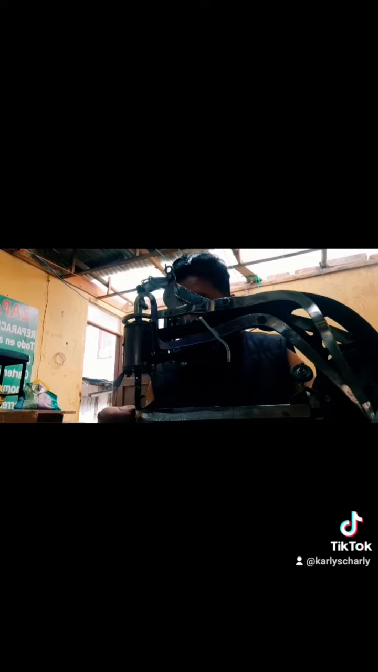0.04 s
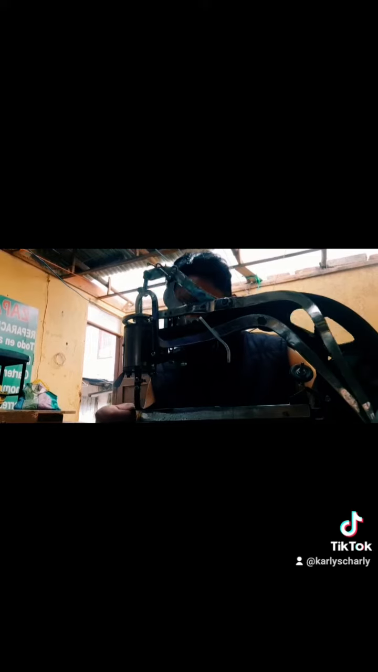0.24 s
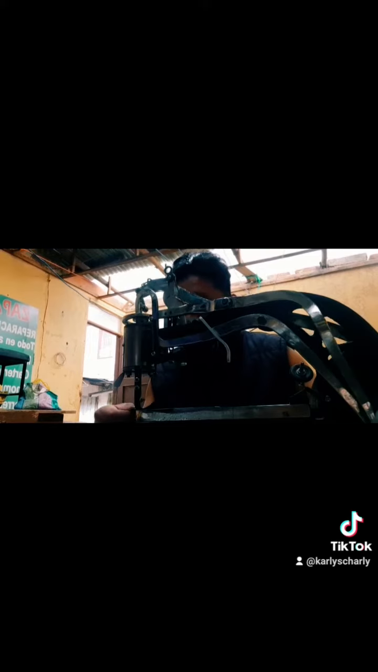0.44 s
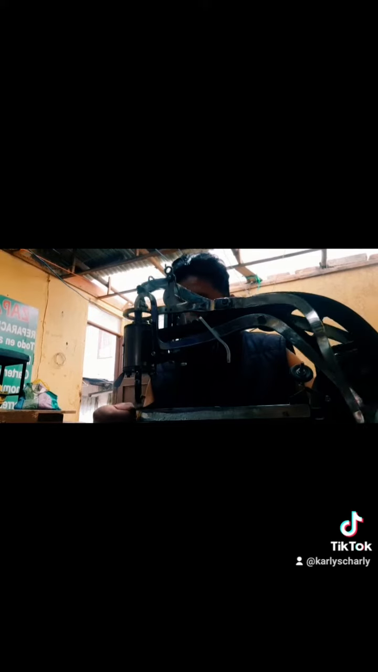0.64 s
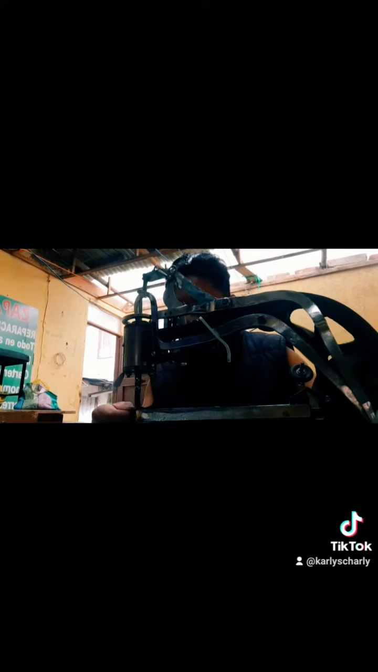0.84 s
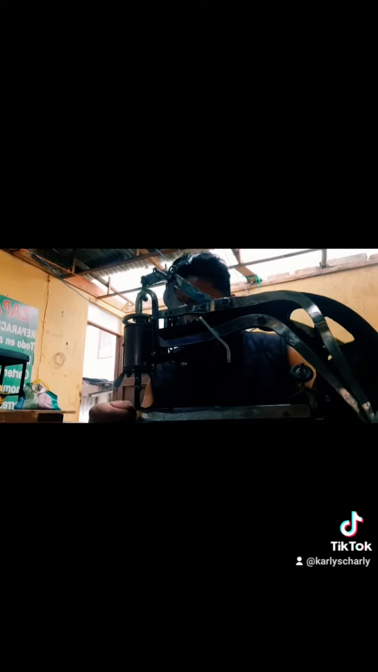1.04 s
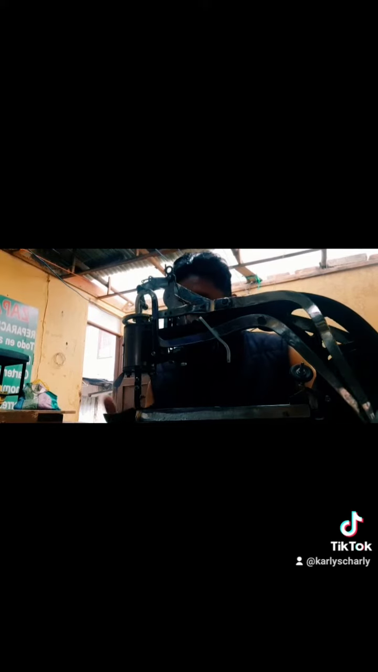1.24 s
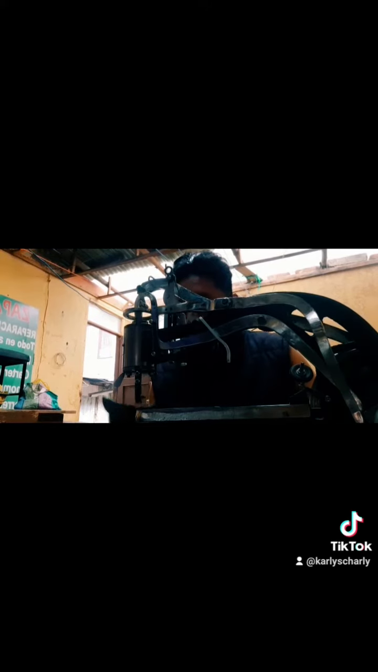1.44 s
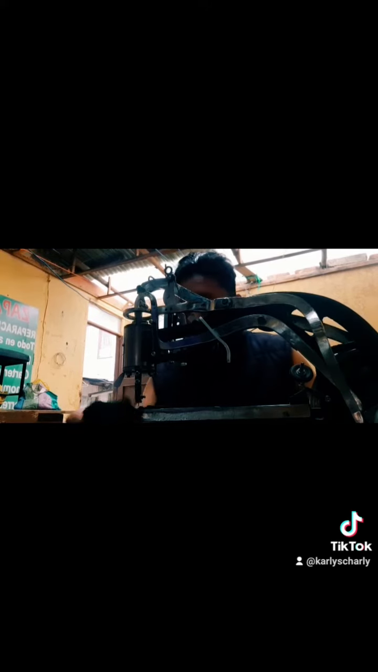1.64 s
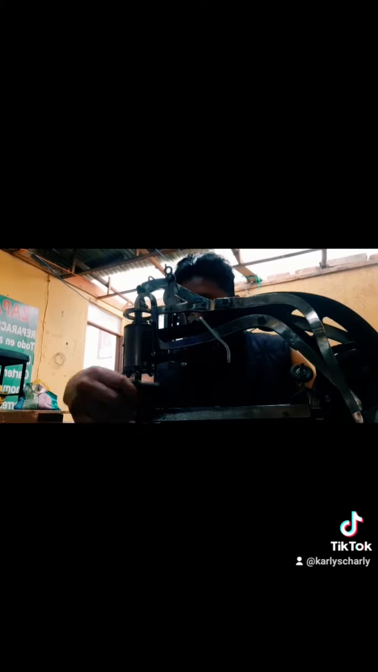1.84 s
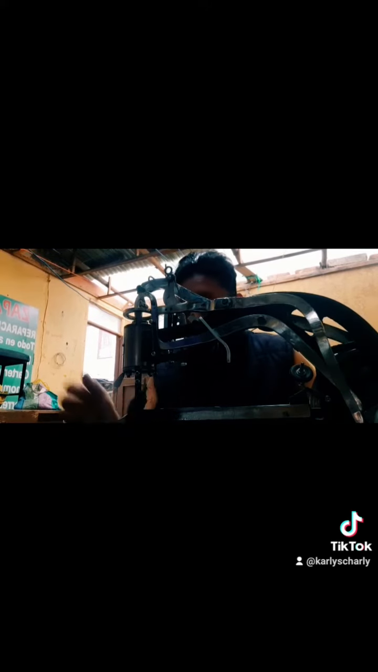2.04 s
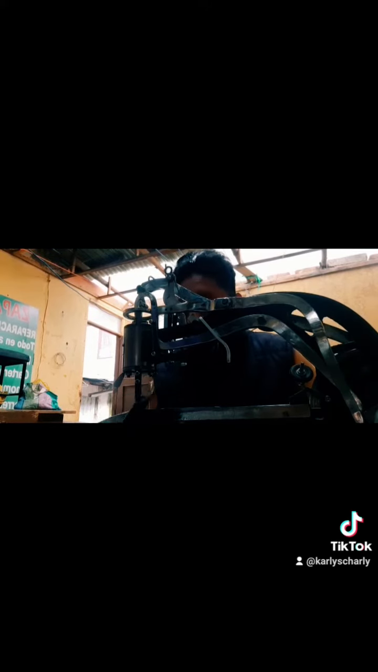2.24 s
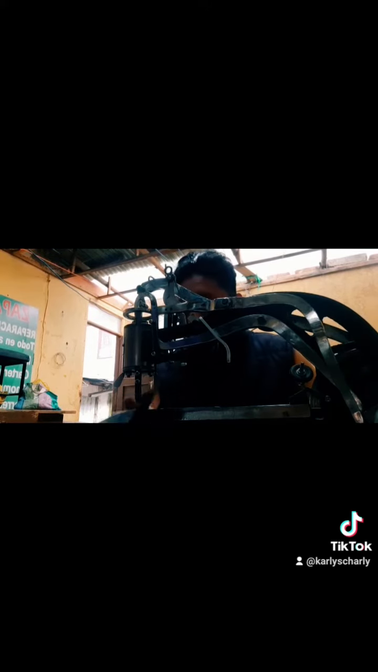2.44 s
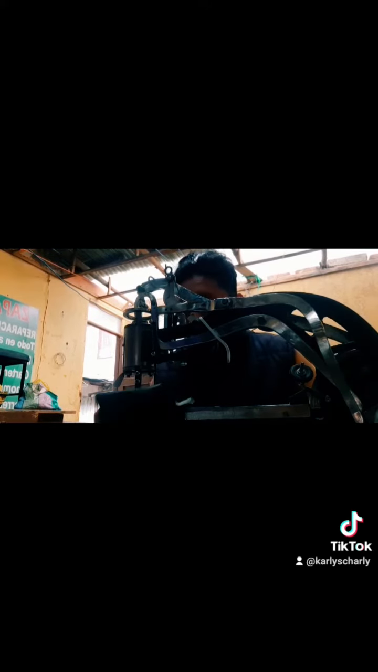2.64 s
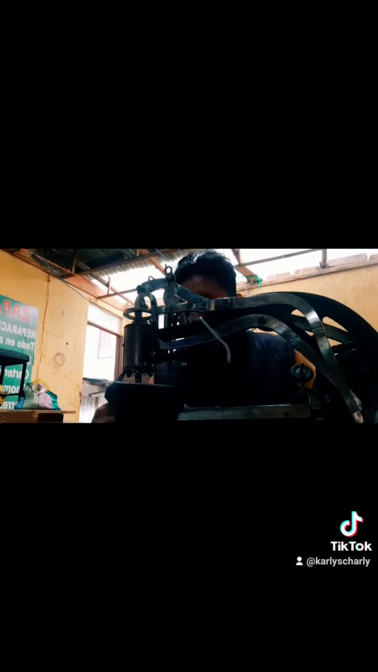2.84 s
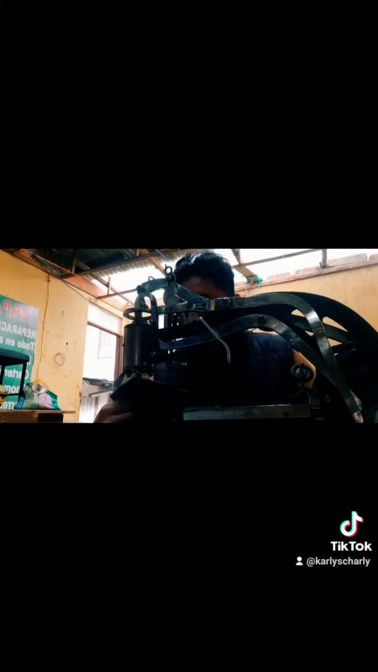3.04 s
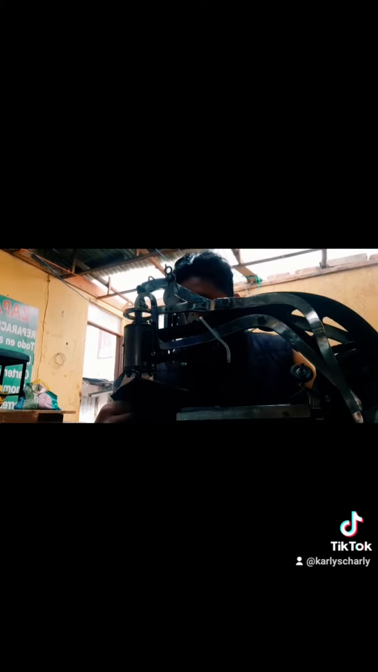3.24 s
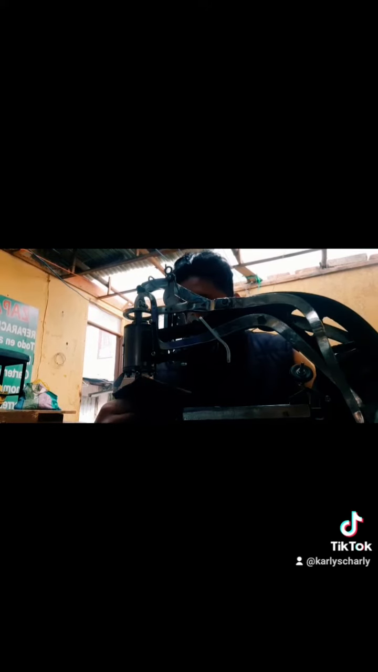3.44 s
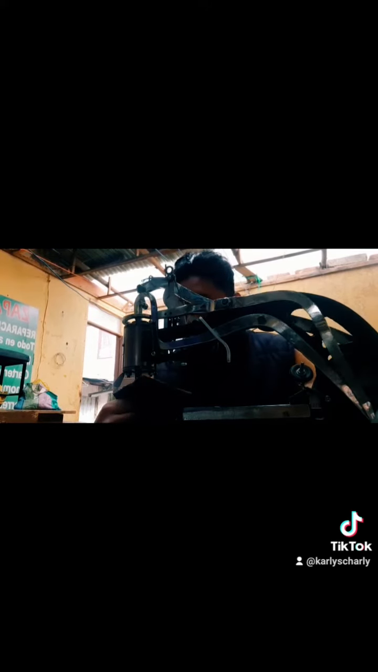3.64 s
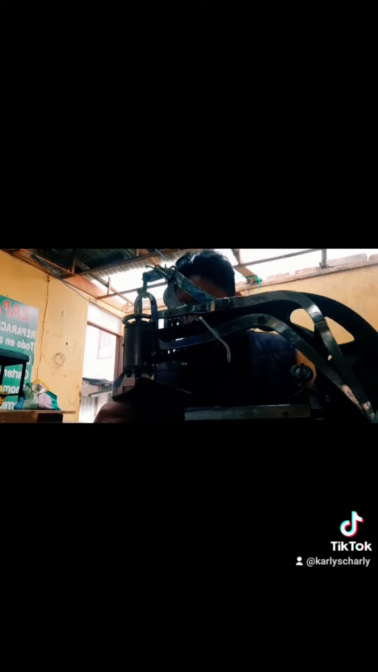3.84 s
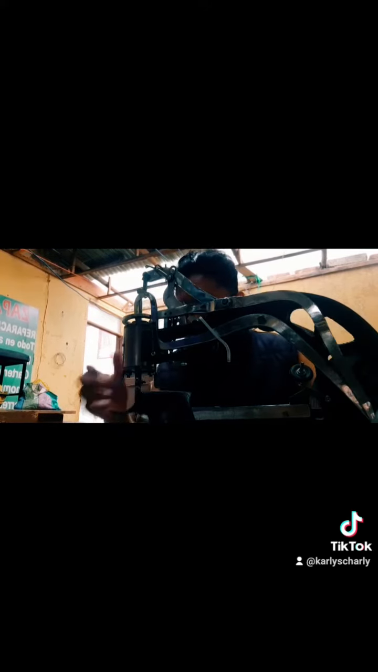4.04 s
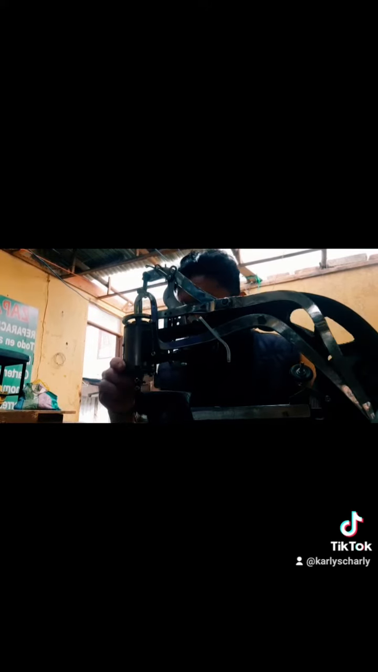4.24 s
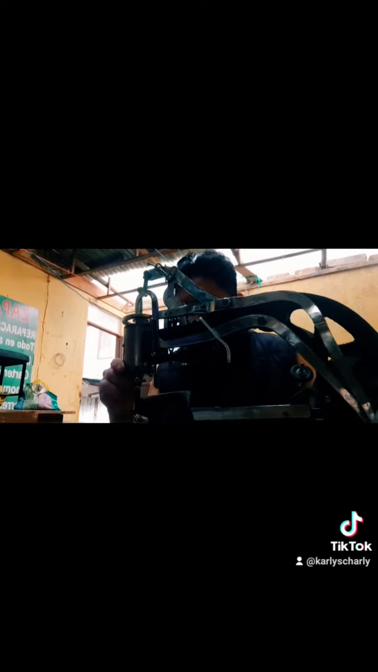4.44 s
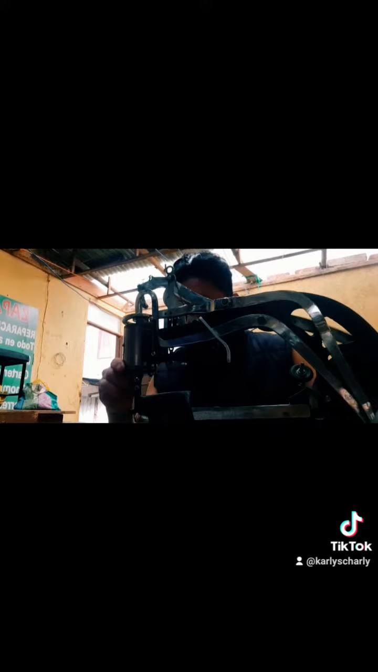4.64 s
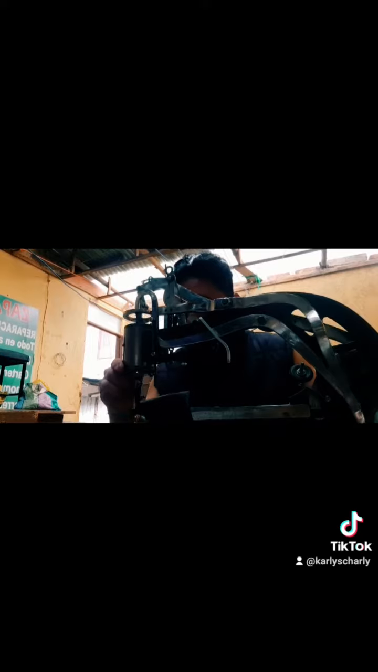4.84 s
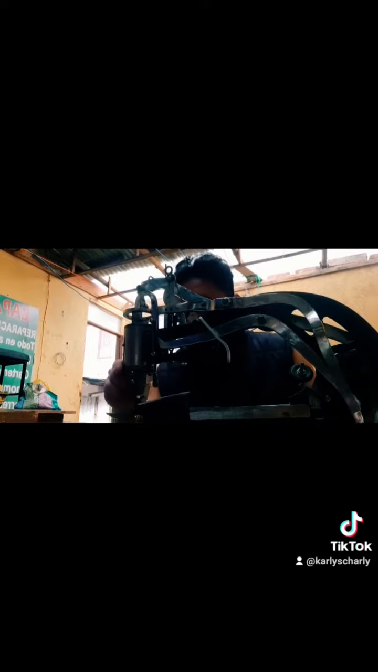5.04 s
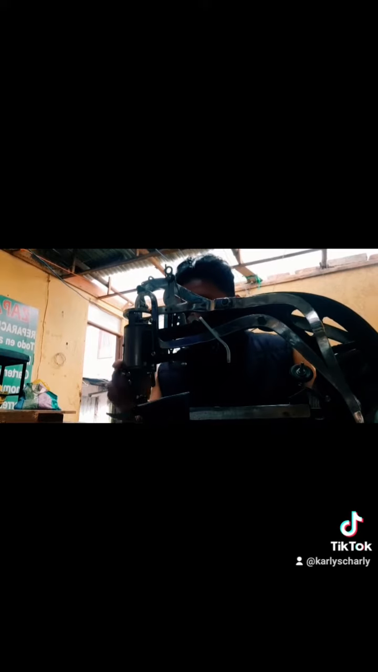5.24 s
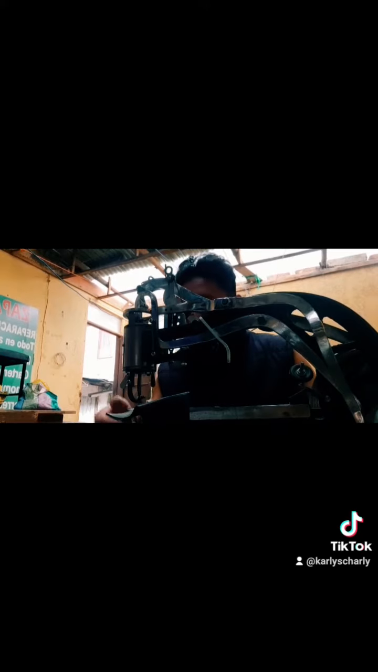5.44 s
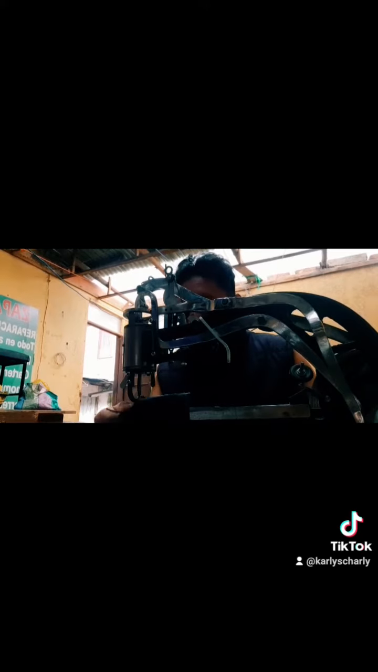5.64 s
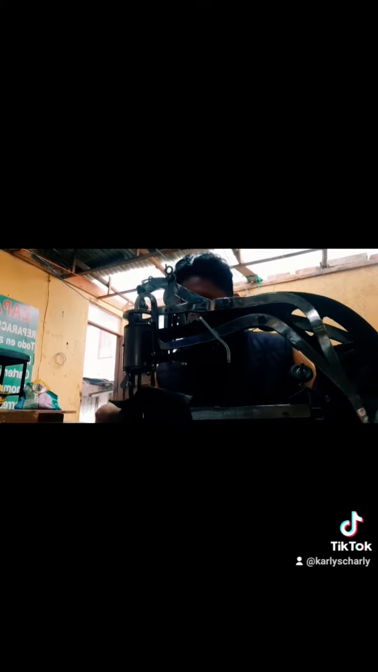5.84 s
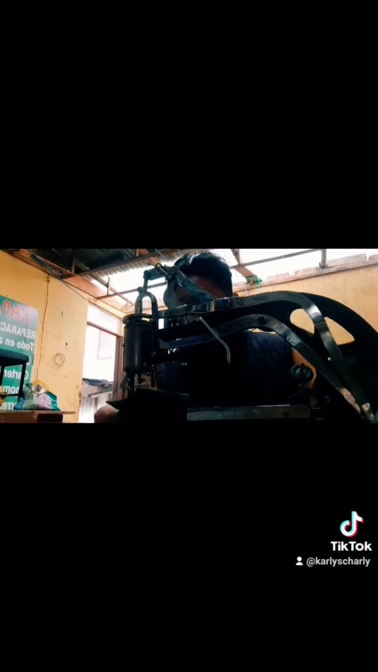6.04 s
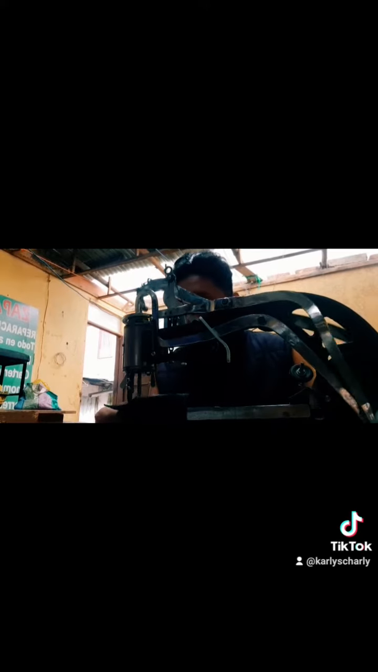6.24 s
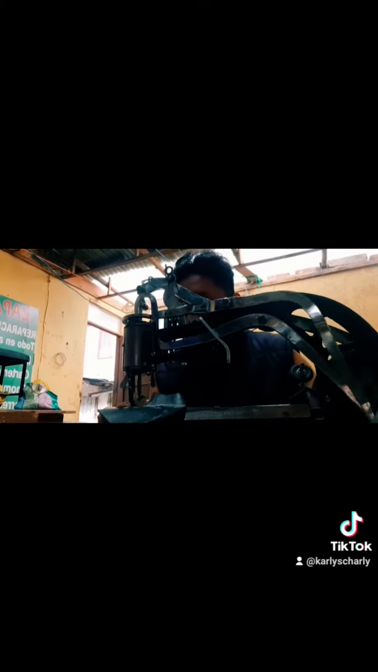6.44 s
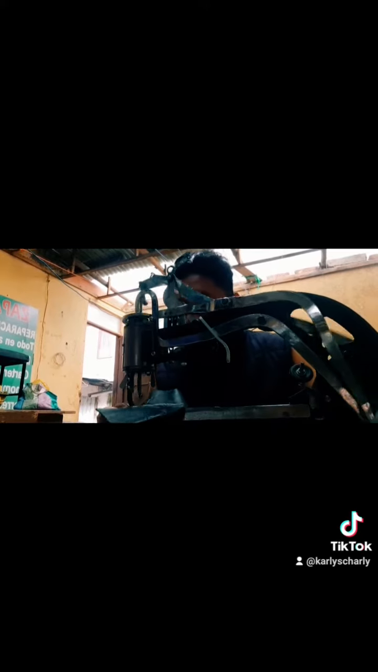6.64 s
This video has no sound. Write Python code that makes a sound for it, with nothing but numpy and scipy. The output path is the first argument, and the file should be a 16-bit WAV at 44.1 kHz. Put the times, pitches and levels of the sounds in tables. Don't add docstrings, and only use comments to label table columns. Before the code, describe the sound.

From 0 to about 1.4 seconds a heavy hand-cranked iron stitching machine clatters very close by, in several overlapping pulls: mid-pitched gear chatter, hard irregular knocks, snapping levers and small bright steel pings, the loudest blows crackling. The iron hum and short hard-walled echo fade. From 1.5 to 3.3 it is quiet: dull street wash, a barely audible low engine, thin dry squeaks, brushing strokes near 1.8 and 2.45 with a fainter one at 3.0, and a tiny tap at 2.4. A short pull clacks from about 3.4 to 3.8. Quiet again, with small squeaks near 4.1, then uneven knocking stitches from 4.3 to 4.85, strongest around 4.7. Another lull holds only faint wash, a soft touch and a weak squeak. At 5.7 cranking restarts, grows heavy by 5.9, and pounds in dense bursts until the abrupt end near 6.7.

```python
import sys
import numpy as np
from scipy import signal
from scipy.fft import rfft, irfft
from scipy.io import wavfile
from scipy.ndimage import uniform_filter1d, minimum_filter1d

SR = 44100
rng = np.random.default_rng(int(sys.argv[2]) if len(sys.argv) > 2 else 0)


def ratio_of_db(decibels):
    return 10 ** (np.asarray(decibels, float) / 20)


def dump(signal):
    limited = np.clip(np.atleast_2d(signal).T, -1, 1)
    pcm = np.round(limited * 32767).astype(np.int16)
    wavfile.write(sys.argv[1], SR, pcm)


N = 295470
PORT_LAG = 8

# pitch in Hz, width in Hz, level in dB.
BASE_MODES = [(351, 34, -2.5), (491.3, 76, -3.5), (573, 52.6, 3), (644.5, 70, -1)]
# pitch in Hz, width in Hz, level in dB.
HEAD_MODES = [(1530, 290, -3), (1608, 150, 4), (1724, 81, -2.5), (1756, 40, -11.5)]
# pitch in Hz, width in Hz, level in dB.
PART_MODES = [(2230, 230, 21), (2440, 330, 4.5), (3080, 140, -5), (3060, 1200, -15.5), (3672, 140, 15.5),
              (3890, 95, 4.5), (4760, 490, -1), (4780, 1200, -21), (6490, 620, -25.5)]


def evened(x):
    return x / np.sqrt(np.mean(x ** 2) + 1e-20)


def read(points, hz):
    f, value = np.transpose(points)
    return np.interp(np.log(hz + 1), np.log(f + 1), value)


def add(mix, s, sound):
    part = mix[..., round(s * SR):][..., :sound.shape[-1]]
    part += sound[..., :part.shape[-1]]


def resonate(x, hz, width):
    turn = np.exp(2j * np.pi * np.cumsum(hz * np.ones(len(x))) / SR)
    r = np.exp(-np.pi * width / SR)
    return 2 * (turn * signal.lfilter([1 - r], [1, -r], x / turn + 1e-18)).real


def coloured(x, points):
    hz = np.fft.rfftfreq(x.shape[-1], 1 / SR)
    return irfft(rfft(x) * ratio_of_db(read(points, hz)), x.shape[-1])


def ports(x, lag, pan_db):
    left = np.r_[np.zeros(lag), x[:len(x) - lag]]
    return np.array([left, x]) * ratio_of_db(np.array([[.5], [-.5]]) * pan_db)


def blow_ports(x):
    lag_samples, pan_db = PORT_LAG + round(2 * rng.standard_normal()), 1 + 2 * rng.standard_normal()
    return ports(x, max(lag_samples, 0), pan_db)


def drone():
    # middle in seconds, level in dB, half length in seconds.
    swells = [
        (1.607, -81, 0.3),
        (3.148, -77, 0.12),
        (4.196, -79, 0.094),
    ]
    t, hz = np.arange(N) / SR, 92
    note = evened(resonate(resonate(rng.standard_normal(N), hz, 14), hz, 18))
    swell = sum(ratio_of_db(db) * np.exp(-((t - s) / half) ** 2) for s, db, half in swells)
    return note * (ratio_of_db(-93.0) + swell)


def street():
    # pitch in Hz, level in dB per Hz.
    street_spectrum = [(24, -68.5), (40, -36.5), (167, -72), (278, -28.5), (417, -16.5), (640, 0),
                       (724, -10.5), (785, -6.5), (1070, -9), (2300, -21), (2700, -33), (4000, -35),
                       (5230, -59), (6800, -85), (11500, -120)]
    # time in seconds, level in dB.
    street_level = [
        (1.6, -49.5),
        (2.299, -48.5),
        (2.599, -49.5),
        (3.3, -47.5),
        (4., -52.5),
        (4.3, -40.5),
        (5.199, -48),
        (5.501, -54),
        (5.7, -47),
    ]
    a, b, c, d, patches = rng.standard_normal((N // 128 + 5, 257, 5)).T
    patches = evened(uniform_filter1d(uniform_filter1d(patches, 3, 0), 30, 1))
    left = a + 1j * b
    right = .7 * left + .7 * (c + 1j * d)
    z = np.array([left, right]) * ratio_of_db(2.5 * patches)
    wash = coloured(signal.istft(z, nperseg=512, noverlap=384)[1][:, :N], street_spectrum)
    level_db = np.interp(np.arange(N) / SR, *np.transpose(street_level)) - 3.0
    return ratio_of_db(level_db) * evened(wash)


def brushing():
    # pitch in Hz, level in dB per Hz.
    brush_spectrum = [(300, -28), (700, -2), (1500, 2.5), (2200, -0.5), (3200, -15.5), (4500, -15),
                      (6000, -21), (7800, -28), (9000, -47)]
    # peak in seconds, level in dB, rise in seconds, fall in seconds.
    strokes = [
        (1.814, -47, 0.023, 0.07),
        (2.45, -47.5, 0.074, 0.036),
        (3.02, -58, 0.12, 0.05),
    ]
    t = np.arange(N) / SR
    bristles = evened(coloured(rng.standard_normal(N), brush_spectrum))
    return bristles * sum(ratio_of_db(db) * np.exp(-((t - s) / np.where(t < s, rise, fall)) ** 2)
                          for s, db, rise, fall in strokes)


def wavering_tone(length, hz0, hz1, db, width):
    size = round(length * SR)
    glide = np.linspace(hz0, hz1, size)
    tone = resonate(resonate(rng.standard_normal(size), glide, width), glide, 3 * width)
    return ratio_of_db(db) * evened(tone) * np.hanning(size) ** .6


def squeaks_and_plate():
    # start in seconds, length in seconds, pitch at start in Hz, pitch at end in Hz, level in dB.
    squeaks = [(1.479, 0.37, 2070, 2150, -55), (1.596, 0.28, 2260, 2300, -61),
               (2.928, 0.15, 1990, 2070, -59.5), (1.875, 0.22, 1013, 984, -56.5),
               (1.998, 0.078, 770, 716, -56), (2.798, 0.043, 810, 774, -52.5),
               (4.09, 0.14, 1203, 1184, -53), (3.984, 0.14, 1030, 1066, -57),
               (4.214, 0.064, 1480, 1585, -45), (5.391, 0.39, 1640, 1530, -62.5),
               (5.591, 0.059, 1760, 1880, -60.5)]
    # start in seconds, length in seconds, level in dB.
    after_rings = [
        (1.282, 0.5, -51.5),
        (2.318, 1, -80.5),
        (4.887, 0.67, -65),
    ]
    plate_hz, plate_width_hz = 327, 33
    out = np.zeros(N)
    for s, length, hz0, hz1, db in squeaks:
        add(out, s, wavering_tone(length, hz0, hz1, db, width=0.035 * hz1))
    for s, length, db in after_rings:
        add(out, s, wavering_tone(length, plate_hz, plate_hz, db, plate_width_hz))
    return out


def lone_rings(x):
    hz, _, z = signal.stft(x, SR, nperseg=1024, noverlap=768)
    strong = abs(z) > 1.7 * uniform_filter1d(abs(z), size=25, axis=0)
    keep = strong | (hz[:, None] < 5600)
    return signal.istft(z * keep, SR, nperseg=1024, noverlap=768)[1][:len(x)]


def walls(x):
    # pitch in Hz, decay by 60 dB in seconds.
    wall_decay = [(300, 0.68), (800, 0.5), (2000, 0.39), (4000, 0.31), (7000, 0.47), (10000, 0.12)]
    taps = np.zeros((6, 30000))
    at = np.arange(300, 29980, 20) + rng.integers(0, 20, (6, 1484))
    np.put_along_axis(taps, at, rng.choice([-1., 1.], at.shape), 1)
    hz, t, z = signal.stft(taps, SR, nperseg=256)
    tail = signal.istft(z * ratio_of_db(-60 * t / read(wall_decay, hz)[:, None]), SR, nperseg=256)[1]
    turn = np.sqrt(2 / 3) * np.cos(np.pi * (7.3 * np.arange(N) / SR + np.arange(3)[:, None] / 3))
    wet = signal.oaconvolve(np.repeat(x * turn, 2, axis=0), tail / np.linalg.norm(tail[0]), axes=1)
    return wet[:, :N].reshape(3, 2, N).sum(0)


def small_hits():
    # start in seconds, peak in dB, ring in Hz.
    teeth = [(0.317, -12, 924), (0.346, -12.5, 1040), (0.358, -13.5, 927), (0.39, -7.5, 979),
             (0.451, -7, 926), (0.507, -7, 1082), (0.755, -9, 933), (0.806, -10.5, 1056),
             (0.994, -18.5, 928), (1.106, -11, 952), (1.119, -10, 1090), (1.196, -9.5, 879),
             (3.559, -13.5, 943), (3.636, -10.5, 848), (3.666, -9.5, 820), (4.272, -24.5, 854),
             (4.622, -17, 965), (4.696, -3.5, 934), (4.843, -14, 920), (5.837, -18, 1074),
             (5.863, -13.5, 660), (5.912, -9, 952), (5.949, -1.5, 819), (6.142, -8.5, 1038),
             (6.165, -7, 1020), (6.231, -6, 1150), (6.289, -8, 1106), (6.607, -7, 949), (6.634, -4.5, 951)]
    # start in seconds, peak in dB, ring in Hz.
    taps = [(0.1154, -26.5, 2433), (0.2099, -18.5, 2910), (0.5008, -10, 2350), (0.7524, -15.5, 2150),
            (0.8659, -19.5, 2230), (0.9941, -18, 2306), (1.1847, -16, 2226), (1.2191, -11, 2180),
            (1.2544, -17, 2280), (3.676, -15, 2230), (4.3624, -25, 2420), (4.6683, -12.5, 2004),
            (4.7456, -3.5, 2235), (4.7676, 0.5, 2135), (5.7189, -27.5, 2260), (6.1055, -17, 2000),
            (6.2562, -5, 2270), (6.2831, -1, 2097), (6.3734, -18, 2230), (6.4617, -13, 2270),
            (6.5564, -6, 2097)]
    # start in seconds, peak in dB, ring in Hz.
    pings = [(0.2914, -19.5, 3720), (0.4713, -24, 3720), (0.486, -22, 3800), (0.5302, -22, 3976),
             (0.5424, -24, 3770), (0.8337, -23.5, 3840), (0.9941, -25.5, 3380), (1.255, -24, 3890),
             (3.5676, -22.5, 3790), (3.6945, -25.5, 3340), (3.796, -37, 3320), (4.4967, -26, 3890),
             (4.571, -24.5, 3670), (4.7526, -19, 3730), (5.7892, -11, 3320), (5.8638, -23, 4030),
             (5.9454, -33, 3460), (6.1174, -21, 3790), (6.2577, -20.5, 3860), (6.2911, -23, 3800),
             (6.3266, -19.5, 3850), (6.4367, -21.5, 3720), (6.5024, -27, 3550)]
    # start in seconds, peak in dB, ring in Hz.
    snaps = [(0.2124, -8.5, 1680), (0.5521, -12.5, 1300), (0.7233, -9, 1528), (0.8764, -8.5, 1650),
             (0.9448, -15, 1493), (5.8625, -21, 1693), (5.9882, -8, 1697), (6.3279, -5.5, 1520),
             (6.3474, -8, 1430), (6.5554, -11, 1655), (2.381, -28.5, 630), (2.378, -26.5, 1335),
             (2.39, -31, 826), (4.206, -34.5, 1600)]
    out, t = np.zeros((2, N)), np.arange(3000) / SR
    for rows, t60, gain_db in ((teeth, .045, -5.5), (taps, .025, -3.5), (pings, .018, 1), (snaps, .03, 0)):
        for (s, db, hz), luck in zip(rows, rng.standard_normal((len(rows), 3))):
            second_hz = hz * (1 + 0.087 * luck[0])
            pair = np.sin(2 * np.pi * hz * t) + 0.39 * np.sin(2 * np.pi * second_hz * t)
            ring = pair * (1 - np.exp(-t * hz / 3.1)) * ratio_of_db(-60 * t / t60)
            ring *= ratio_of_db(db + gain_db) / abs(ring).max()
            add(out, s, ports(ring, max(PORT_LAG + round(luck[1]), 0), 1 + 2 * luck[2]))
    return out


def impacts(size, per_s, spread_db):
    hit = rng.random(size) < per_s / SR
    return hit * rng.choice([-1, 1], size) * ratio_of_db(spread_db * np.minimum(rng.exponential(1, size), 3))


def rung(drive, modes, pitch=1):
    return evened(sum(ratio_of_db(db) * resonate(resonate(drive, f * pitch, w), f * pitch, 7 * w) / np.sqrt(w)
                      for f, w, db in modes))


def chatter(rows):
    # factor on the arm's pitch, width in Hz, level in dB.
    arm_modes = [(0.904, 69.8, 5), (1, 53.7, 8.5), (1.135, 61.4, 7.5), (1.268, 80.7, -18.5)]
    # pitch in Hz, width in Hz, level in dB.
    jingle_modes = [(10400, 700, 4), (11900, 900, 9), (13100, 1200, 1)]
    s, *columns = np.transpose(rows)
    t = np.arange(s[0], s[-1], 1 / SR)
    load_db, arm_hz, slack_db = (np.interp(t, s, c) for c in columns)
    arm_db = -2.5 + load_db
    base_db = -5.5 + slack_db + 0.53 * (load_db - slack_db)
    head_db = -1.5 + slack_db + 0.72 * (load_db - slack_db)
    parts_db = -1.5 + slack_db - 2.5

    shared = impacts(len(t), per_s=350, spread_db=3.0)

    def greased(contact_samples):
        own = shared + 1.14 * impacts(len(t), per_s=900, spread_db=3)
        return signal.lfilter(np.hanning(contact_samples), 1, own)

    rattle = .5 * shared + impacts(len(t), per_s=400, spread_db=5)
    scuff = impacts(len(t), per_s=3000, spread_db=3)
    parts = rung(rattle, PART_MODES[:6]) + ratio_of_db(-27) * lone_rings(rung(scuff, PART_MODES[6:]))
    jingle = lone_rings(rung(scuff, jingle_modes))
    frame = ports(ratio_of_db(arm_db) * rung(greased(20), arm_modes, arm_hz), lag=7, pan_db=0.94)
    frame += ports(ratio_of_db(base_db) * rung(greased(24), BASE_MODES), lag=8, pan_db=-7.0)
    frame += ports(ratio_of_db(head_db) * rung(greased(14), HEAD_MODES), lag=8, pan_db=9.3)
    frame += ports(ratio_of_db(parts_db) * parts, lag=6, pan_db=0.3)
    frame += ports(ratio_of_db(1.31 * parts_db + 13) * jingle, lag=6, pan_db=3)
    return s[0], frame * np.minimum((s[-1] - t) / 0.006, 1)


def cranking():
    # time in seconds, load in dB, arm pitch in Hz, slack in dB.
    first_pulls = [
        [(0.0, -4.5, 930, -12.5), (0.032, -13, 936, -38.5), (0.082, -16, 893, -34), (0.114, -16, 1065, -20),
         (0.186, -27, 991, -40), (0.214, -13.5, 972, -17.5), (0.236, -27, 937, -32), (0.268, -32, 994, -26),
         (0.34, -20.5, 907, -44)],
        [(0.35, -26.5, 1004, -39.5), (0.428, -15, 970, -31), (0.448, -17, 968, -34.5),
         (0.498, -17.5, 979, -18.5), (0.588, -18, 1081, -38.5), (0.598, -20.5, 1040, -17.5),
         (0.624, -25, 1077, -36.5), (0.636, -21, 1068, -19.5), (0.68, -24, 1103, -37.5)],
        [(0.69, -14.5, 970, -29.5), (0.736, -16, 968, -30.5), (0.784, -14.5, 959, -26.5),
         (0.804, -12.5, 1002, -20), (0.876, -29.5, 956, -46.5), (0.896, -18, 978, -22),
         (0.926, -21, 943, -37.5), (1.014, -34, 953, -33), (1.04, -22.5, 974, -54)],
        [(1.05, -27, 1040, -52), (1.14, -23, 977, -35.5), (1.156, -12, 955, -36.5), (1.17, -17, 966, -36),
         (1.256, -19.5, 955, -21), (1.286, -14.5, 1013, -33.5), (1.368, -32.5, 1059, -35),
         (1.39, -33, 1130, -31.5), (1.4, -36, 1132, -30)],
    ]
    # time in seconds, load in dB, arm pitch in Hz, slack in dB.
    short_pull = [
        (3.525, -41, 1194, -26),
        (3.573, -17.5, 954, -28.5),
        (3.595, -14.5, 963, -35),
        (3.707, -18.5, 894, -34),
        (3.73, -30.5, 990, -29.5),
        (3.82, -49.5, 992, -56.5),
    ]
    # time in seconds, load in dB, arm pitch in Hz, slack in dB.
    uneven_pull = [
        (4.2, -60.5, 1064, -75.5),
        (4.286, -33, 960, -47.5),
        (4.294, -21.5, 1080, -32),
        (4.4, -36.5, 1003, -52),
        (4.425, -20, 954, -27.5),
        (4.534, -28, 943, -24),
        (4.627, -15, 967, -45),
        (4.783, -17.5, 946, -19.5),
        (4.86, -29, 1000, -34.5),
    ]
    # time in seconds, load in dB, arm pitch in Hz, slack in dB.
    last_pulls = [
        [(5.6, -52.5, 993, -82), (5.712, -46, 1033, -53.5), (5.734, -25, 1030, -37), (5.75, -28, 1003, -45),
         (5.782, -31, 963, -53.5), (5.792, -28.5, 974, -20.5), (5.816, -32, 1054, -32.5),
         (5.856, -21.5, 1067, -25.5), (5.89, -15, 1098, -26)],
        [(5.895, -13, 950, -35), (5.899, -12, 928, -30.5), (5.983, -10.5, 944, -17.5), (5.995, -9, 952, -17),
         (6.025, -22.5, 990, -39), (6.035, -12, 1009, -17), (6.069, -28.5, 945, -35.5),
         (6.087, -19.5, 886, -17.5), (6.16, -35, 981, -31.5)],
        [(6.165, -24, 990, -35.5), (6.195, -15.5, 972, -39), (6.223, -13.5, 942, -34.5),
         (6.235, -18, 1000, -39.5), (6.281, -13, 1037, -18.5), (6.309, -8.5, 1046, -27),
         (6.351, -17.5, 1113, -18.5), (6.391, -30.5, 1055, -22.5), (6.42, -12.5, 1061, -22.5)],
        [(6.425, -13, 956, -31), (6.479, -21.5, 998, -38), (6.487, -10.5, 1091, -17), (6.551, -21, 970, -30.5),
         (6.559, -19.5, 990, -21), (6.613, -24.5, 980, -32), (6.655, -12.5, 956, -48),
         (6.679, -11.5, 960, -26.5), (6.7, -16, 986, -29.5)],
    ]
    frame = np.zeros((2, N))
    for rows in (sum(first_pulls, []), short_pull, uneven_pull, sum(last_pulls, [])):
        add(frame, *chatter(rows))
    return frame


def knock(db, hz, treble_db, t60, rise_s):
    # pitch in Hz, level in dB per Hz.
    crack_spectrum = [(200, -31.5), (600, -11), (1200, -5.5), (2300, 7), (3050, 5), (3900, 1.5), (5200, -9),
                      (7000, -25.5), (9000, -34.5), (14000, -29.5)]
    t = np.arange(4096) / SR
    crack = coloured(rng.standard_normal(4096), crack_spectrum)
    crack = coloured(crack, [(1500, 0.015), (4000, treble_db + 5.0)])
    bounces = np.exp(-(t / (0.21 * t60)) ** 2) + .16 * ratio_of_db(-60 * t / (4 * t60))
    sound = 0.6 * evened(crack) * bounces
    sound += .9 * np.sin(2 * np.pi * hz * t) * ratio_of_db(-60 * np.maximum(t - .004, 0) / t60)
    for f, width, mode_db in [*BASE_MODES, *HEAD_MODES, *PART_MODES[:6]]:
        near_db = -9 * abs(np.log2(f / hz)) + 3 * rng.standard_normal()
        detuned_hz = f + 0.54 * width * rng.standard_normal()
        decay_db = -60 * t * np.sqrt(f / 1100) / t60
        sound += 0.12 * ratio_of_db(near_db + 0.61 * mode_db + decay_db) * np.sin(2 * np.pi * detuned_hz * t)
    sound *= 1 - np.exp(-(t / rise_s) ** 1.5)
    return ratio_of_db(db - 3.5) * sound / abs(sound).max()


def knocks():
    # start in seconds, peak in dB, main ring in Hz, treble share in dB.
    first_run = [(0.06, 1.5, 860, -40.5), (0.088, -5, 1726, -24.5), (0.107, -7.5, 1655, -15.5),
                 (0.144, -11, 541, -12), (0.206, -0.5, 926, -16), (0.249, -7, 1790, -25.5),
                 (0.272, -4, 1654, -28), (0.306, -17, 932, -11.5), (0.382, -20.5, 1140, -50.5),
                 (0.401, -15, 933, -35), (0.42, -3, 927, -31.5), (0.498, -5.5, 1067, -17),
                 (0.529, 2, 1497, -35.5), (0.594, -2, 1307, -20), (0.633, -6, 2270, -6.5),
                 (0.734, -5, 873, -34), (0.772, -6.5, 893, -38.5), (0.796, -4.5, 919, -19.5),
                 (0.833, -17, 954, -14), (0.895, -2.5, 1920, -12.5), (0.971, -9.5, 1473, -24),
                 (1.019, -18, 966, -4), (1.106, -28, 926, -23.5), (1.154, -7.5, 896, -31.5),
                 (1.21, -4.5, 961, -23.5), (1.23, -6, 1663, -29), (1.24, 1, 907, -18.5),
                 (1.384, -10, 1460, -22)]
    # start in seconds, peak in dB, main ring in Hz, treble share in dB.
    single_stitches = [(3.367, -12, 1155, -30), (3.527, -10, 1280, -15.5), (3.588, -11, 920, -37.5),
                       (3.614, -12.5, 823, -40.5), (3.716, -6.5, 2280, -14), (3.795, -19, 1647, -28),
                       (4.296, -8, 1526, -22.5), (4.305, -11, 1450, -29), (4.421, -9, 900, -30),
                       (4.43, 0, 1710, -20), (4.523, -11.5, 1400, -28), (4.542, -10.5, 1316, -13),
                       (4.646, -20, 1120, -32), (4.686, 1, 1645, -24), (4.723, -2.5, 930, -48),
                       (4.766, -2, 936, -14), (4.812, -17, 1100, -33)]
    # start in seconds, peak in dB, main ring in Hz, treble share in dB.
    last_run = [(5.731, -16, 1290, -30), (5.791, -9.5, 2314, -5), (5.898, -7.5, 910, -28.5),
                (5.985, -9.5, 1684, 1), (5.998, -7, 1092, -22), (6.032, -4.5, 1603, -22.5),
                (6.083, 2.5, 896, -28), (6.19, -14.5, 978, -37.5), (6.217, -2, 967, -22.5),
                (6.279, 2.5, 1060, -17), (6.312, -1, 1124, -25.5), (6.345, 0.5, 1436, -15.5),
                (6.425, 2.5, 868, -27.5), (6.488, 1.5, 1080, -11.5), (6.513, -12.5, 565, -26),
                (6.573, -6.5, 1553, -12), (6.657, -1, 947, -35), (6.677, -6, 825, -28)]
    # start in seconds, peak in dB, main ring in Hz, treble share in dB.
    handling = [
        (4.204, -37.5, 876, -59),
        (5.244, -37.5, 582, -37.5),
        (5.659, -39.5, 614, -51.5),
    ]
    out, blows = np.zeros((2, N)), [*first_run, *single_stitches, *last_run, *handling]
    for s, db, hz, treble_db in blows:
        t60 = 0.03 * np.exp(-0.0066 * (db + 3.5))
        rise_s = .0004 * ratio_of_db(max(-22 - db, 0))
        add(out, s, blow_ports(knock(db + 7, hz, treble_db, t60, rise_s)))
    return out, np.array(blows)[:, 0]


def gear_play(starts):
    backlash_db, backlash_s = -8, .007
    settle_db, settle_s = -6.5, .016
    before = starts[:, None] - np.arange(0, N, 32) / SR
    free = ((before > 0) * np.exp(-(before / backlash_s) ** 2)).max(0)
    calm = 1 - ((before <= 0) * np.exp(-abs(before) / settle_s)).max(0)
    shake_db = backlash_db * free + settle_db * (calm - .5)
    return ratio_of_db(uniform_filter1d(np.repeat(shake_db, 32)[:N], size=64))


def microphone(x):
    # pitch in Hz, level in dB.
    mic_response = [(60, -53), (250, -25), (380, -12.5), (480, 1.5), (4100, 2.5), (4800, -4), (6000, -3),
                    (7800, -24.5), (9000, -47.5), (10500, -40.5), (14000, -38), (16000, -54.5)]
    log_gain = np.log(ratio_of_db(read(mic_response, abs(np.fft.fftfreq(8192, 1 / SR)))))
    taps = np.fft.ifft(np.exp(np.conj(signal.hilbert(log_gain)))).real[:3000]
    return signal.oaconvolve(x, taps[None])[:, :N]


def scene():
    far = brushing() + squeaks_and_plate()
    blows, starts = knocks()
    blows += small_hits()
    frame = cranking() * gear_play(starts)
    echo = walls(ratio_of_db(-6.0) * frame[1] + ratio_of_db(-9) * blows[1] + far)
    echo = np.array([lone_rings(side) for side in echo])
    echo += coloured(echo[::-1], [(450, -6), (1000, -26.5)])
    return microphone(frame + blows + echo + 0.6 * far) + street() + drone()


def overloads(held):
    # start in seconds, tick peak in dB, low push in dB.
    overload_cuts = [(0.001, -37.5, -44), (0.089, -60, -68), (0.11, -40, -64), (0.1153, -40.5, -52.5),
                     (0.206, -59.5, -55.5), (0.406, -50.5, -77.5), (0.419, -38.5, -58),
                     (0.4254, -62.5, -81), (0.4986, -37, -44), (0.595, -58.5, -49), (0.7969, -49.5, -57.5),
                     (0.8068, -39, -56), (0.81, -39.5, -46), (1.156, -42, -53), (1.2411, -38, -45),
                     (3.7025, -58, -84), (3.7189, -41.5, -55.5), (4.2977, -38, -53), (4.6869, -43.5, -41),
                     (4.7619, -44.5, -44.5), (5.7907, -52.5, -56), (5.9548, -44.5, -73.5),
                     (5.9946, -43, -52), (6.0372, -47.5, -52), (6.22, -40, -49), (6.2789, -43.5, -47),
                     (6.343, -40.5, -41.5), (6.428, -44.5, -49.5), (6.492, -45, -45.5),
                     (6.5747, -56, -49.5), (6.675, -45.5, -61.5), (0.634, -50.5, -66.5), (4.6656, -63, -68),
                     (5.946, -56.5, -74), (6.2692, -55.5, -58), (6.437, -49, -54), (6.503, -57, -59)]
    # pitch in Hz, level in dB.
    converter_response = [(25, 1), (150, 3.5), (5000, 14), (11000, 0.5), (14500, -1.5), (16000, -8.5),
                          (20000, -19.5)]
    t, cuts = np.arange(260) / SR, np.zeros_like(held)
    pan_db = 3.5 * np.array([[.5], [-.5]])
    for s, tick_db, push_db in overload_cuts:
        swings = rng.standard_normal((2, len(t)))
        nicks = swings * (abs(swings) > 1.3) * np.exp(-t / .0016)
        shares = np.where(rng.standard_normal() > -.3, [[1.3], [.2]], [[.2], [1.3]])
        push = rng.choice([-1, 1]) * shares * np.hanning(len(t)) ** 4
        add(cuts, s, ratio_of_db(tick_db + 8.5 + pan_db) * nicks / abs(nicks).max() + ratio_of_db(push_db + 12) * push)
    cuts += ratio_of_db(-30) * coloured(held ** 4 * [[1], [-.5]], [(10, -40), (60, 0), (200, 2), (400, -30)])
    return coloured(cuts, converter_response)


def low_pass(x):
    return signal.sosfilt(signal.butter(12, 16000, fs=SR, output="sos"), x)


def record(dry):
    peak = -minimum_filter1d(-abs(dry).max(0), 120)
    held = dry / uniform_filter1d(np.maximum(peak / .97, 1), 100)
    return low_pass(np.clip(held + overloads(held), -.995, .995))


dry = scene()
out = record(dry)
dump(out)
```